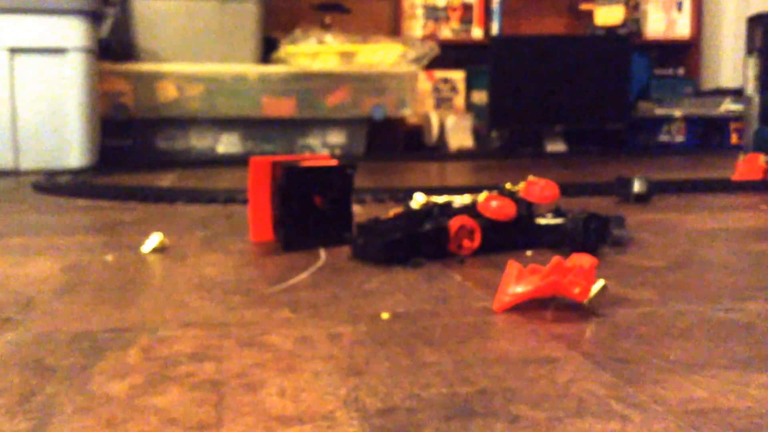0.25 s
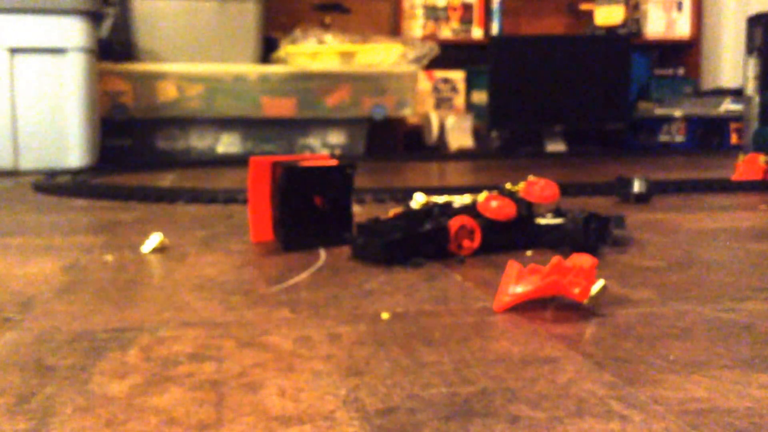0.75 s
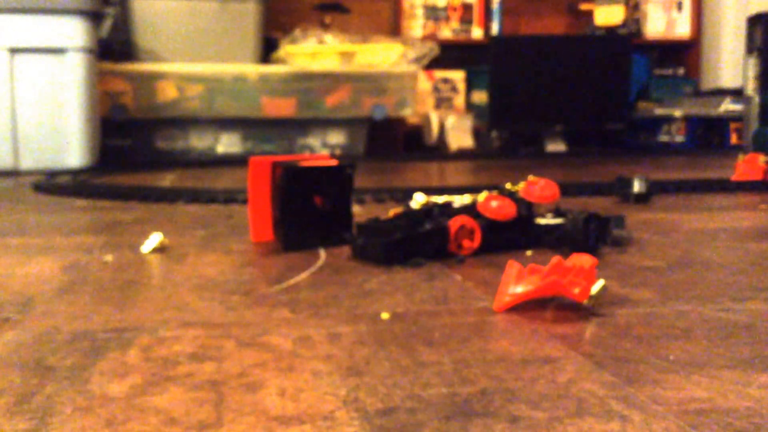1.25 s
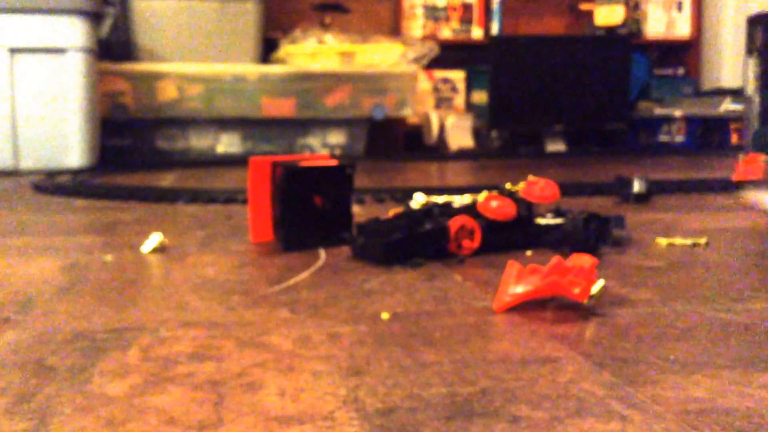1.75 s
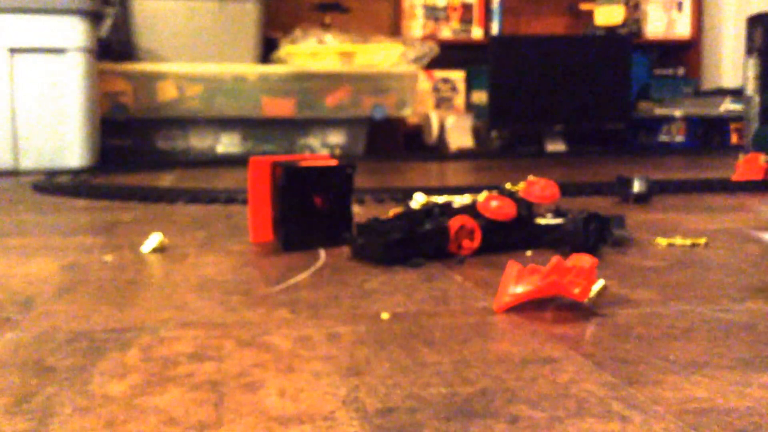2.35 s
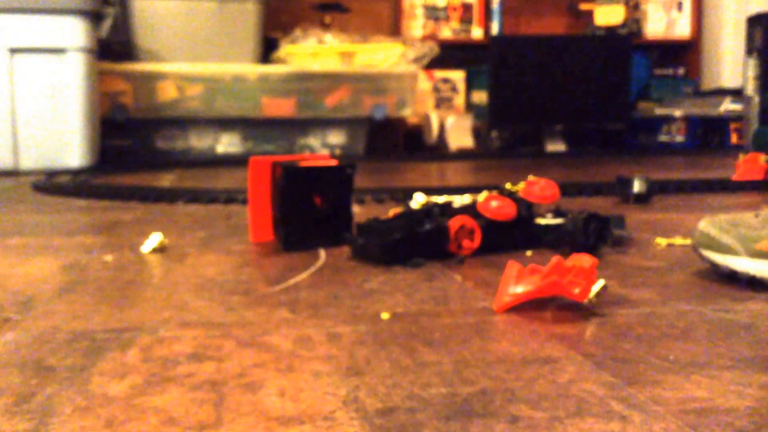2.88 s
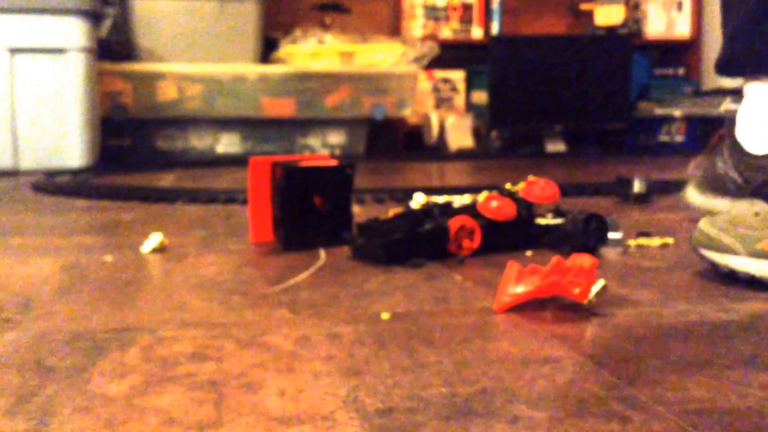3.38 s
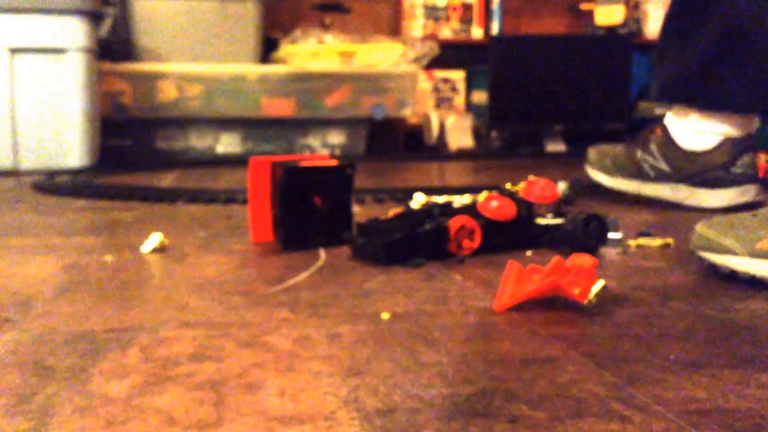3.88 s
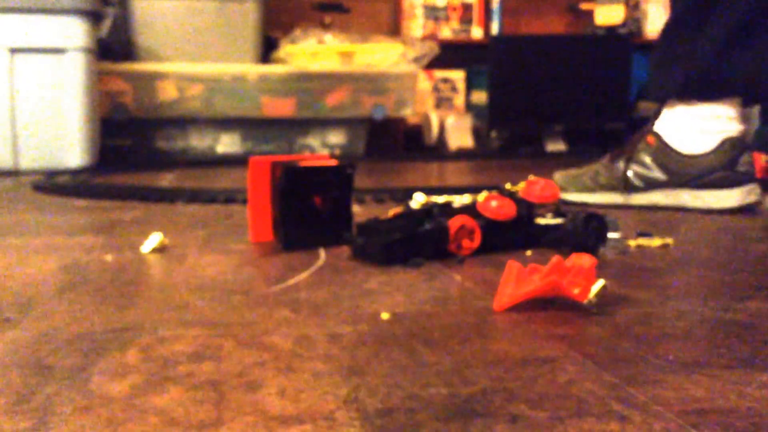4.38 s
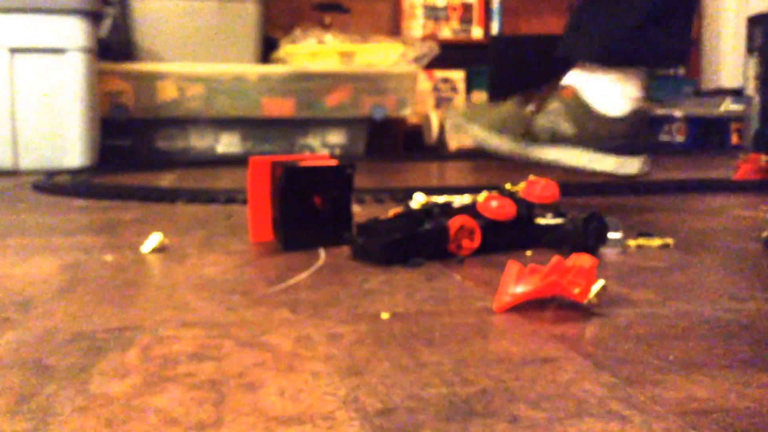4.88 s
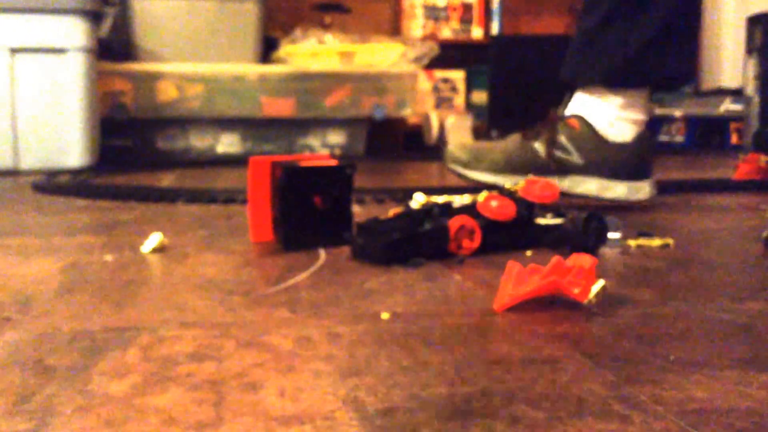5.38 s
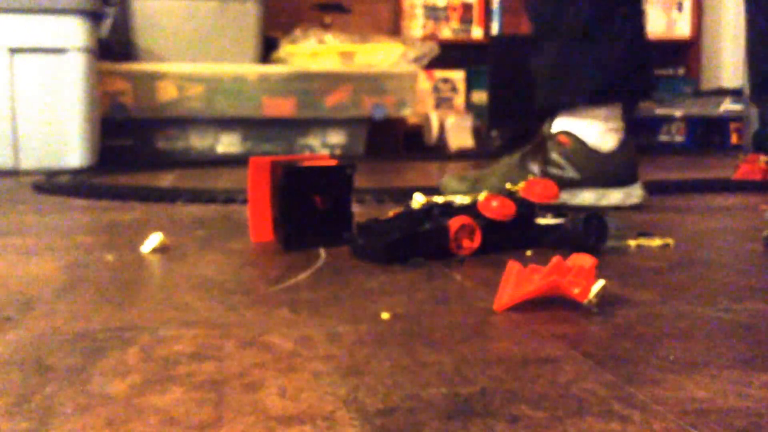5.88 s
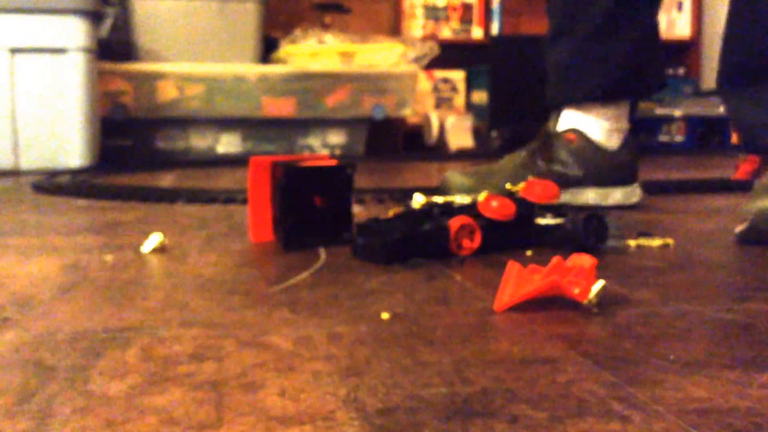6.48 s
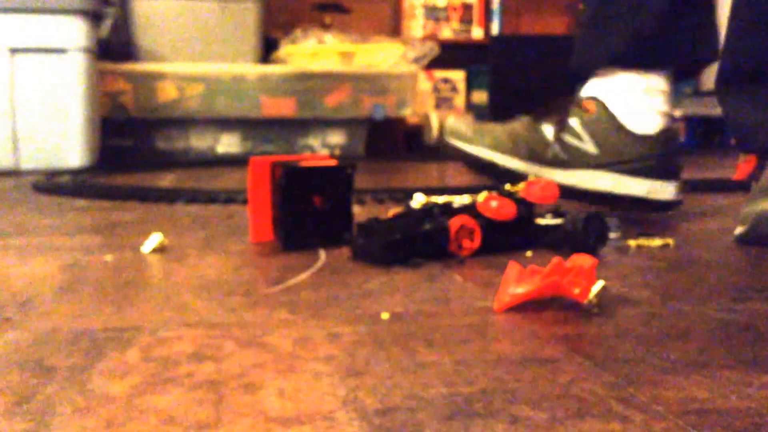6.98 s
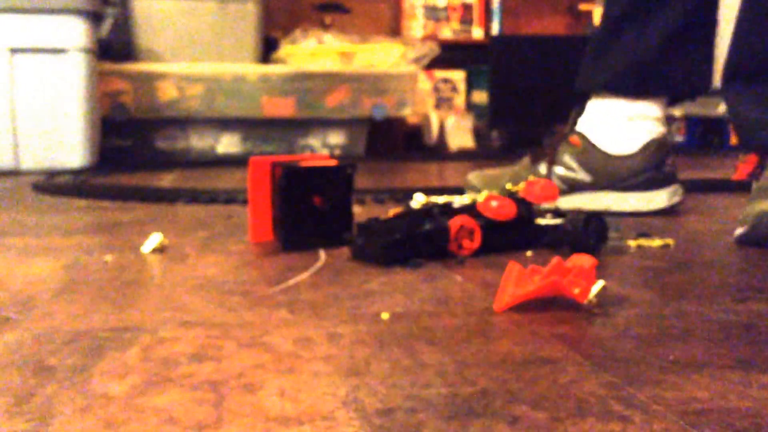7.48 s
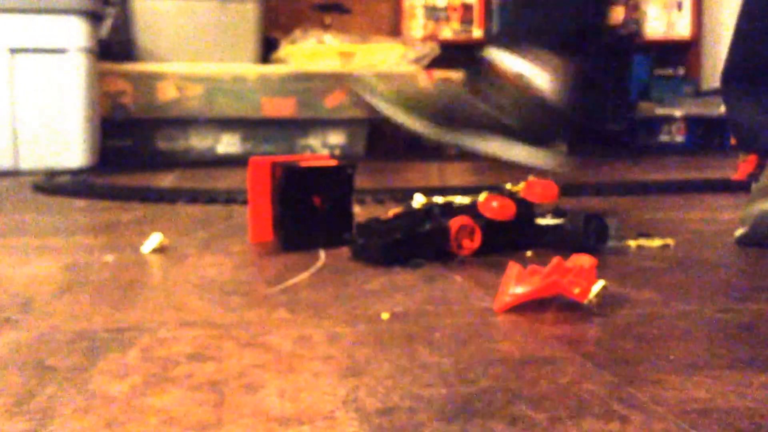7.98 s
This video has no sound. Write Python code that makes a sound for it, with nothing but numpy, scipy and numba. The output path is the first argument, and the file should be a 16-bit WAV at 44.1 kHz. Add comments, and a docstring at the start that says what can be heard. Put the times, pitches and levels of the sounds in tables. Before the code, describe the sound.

Shoes shuffle around a broken plastic toy in a room, their soles rasping on the gritty hard floor and nudging loose parts that tick and rattle. After some soft steps, one shoe comes down hard and the plastic bursts into sharp cracks, slightly overloading the nearby microphone. A few more scrapes and heel thuds come before a shorter, weaker crunch closes the sequence. A faint hum sits behind.

```python
"""Shoes shuffle and step among the pieces of a broken plastic toy, on the hard floor of a cluttered room.
Close to the microphone, soles drag over grit, heels thud and loose parts are knocked and tinkle;
twice a shoe comes down hard and plastic shatters. Further off, the room rings for half a second
over a faint hum. One microphone, mono; the loudest blows overload the recorder slightly."""
import sys
import numpy as np
from scipy import signal
from scipy.fft import rfft, irfft
from scipy.io import wavfile
from scipy.ndimage import uniform_filter1d
from numba import njit

SR = 44100
rng = np.random.default_rng(int(sys.argv[2]) if len(sys.argv) > 2 else 0)


def transcribe(u):
    """Save the signal u as a 16-bit wav file named by the first command-line argument.

    u: samples, shape (n,) or (channels, n), limited to [-1, 1]; the rate is SR.
    q: integer samples, one column per channel.
    """
    v = np.clip(np.atleast_2d(u).T, -1, 1)
    q = np.round(v * 32767).astype(np.int16)
    wavfile.write(sys.argv[1], SR, q)


N = 363384

# Room tone at the microphone: (frequency [Hz], relative level [dB])
AIR_SPECTRUM = [(18, -62), (30, -37.5), (64, -23.5), (95, -19.5), (165, -8.5), (240, -1), (400, -1),
                (500, -1.5), (630, -9), (700, -7), (820, -11), (1010, -12), (2000, -21), (15800, -25)]
# Decay of the room: (frequency [Hz], t60 [s], relative level [dB])
ROOM_DECAY = [(100, 0.75, 4.5), (296, 0.12, -1), (711, 0.42, 1), (1780, 0.45, -0.5), (4770, 0.51, -2),
              (11900, 0.16, -0.5)]
# Modes of a hollow piece: (frequency [Hz], gain [dB], t60 [s])
HOLLOW_MODES = [(492, -4, 0.031), (1632, -6.5, 0.018), (4410, -2, 0.024), (5060, -6, 0.017),
                (5800, -4, 0.013)]
# Modes of a small hard part: (frequency [Hz], gain [dB], t60 before the cap [s])
PART_MODES = [(5600, 3, 0.036), (8150, 0, 0.033), (8900, -2, .015), (9860, -0.5, .015), (10900, -4, 0.019),
              (11900, -5, 0.012), (13800, -4, 0.016)]
# Bounces of that part: (time [s], level [dB], tilt about 8 kHz [dB/octave])
BOUNCES = [(2.989, -51, 29), (3.077, -30.5, 3.5)]
# Plastic knocked or snapping: (time [s], level [dB], pitch [Hz], treble gain [dB], contact time [s])
CRACKS = [(0.107, -44, 4300, 15, 0.006), (.138, -23, 1145, -23, 0.003), (0.1613, -15, 1800, -22, 0.0033),
          (0.3094, -39, 1650, 6, 0.0018), (0.637, -38, 1530, -22, 0.0026), (.676, -34, 1410, -40, 0.00069),
          (0.714, -33.5, 1500, -8, 0.0031), (1.1935, -13.5, 2000, -18, 0.0013),
          (1.396, -20, 2160, 6, 0.014), (1.521, -32, 5300, 12.5, 0.0036),
          (1.5813, -32.5, 5250, -25, 0.0028), (2.0724, -37.5, 1350, -17, 0.0041),
          (2.1196, -35, 2070, -22, 0.0022), (2.4352, -26.5, 3140, -6, 0.0006), (3.157, -34, 3300, 12, .002),
          (3.18, -32.5, 3580, -21, 0.0043), (3.2598, -35.5, 4270, -11, 0.0027),
          (3.6693, -47, 3560, -16, .003), (3.715, -40, 3800, 2, 0.0026), (3.7402, -37.5, 5400, -12, 0.0044),
          (3.8342, -39, 2870, -10, 0.0026), (3.876, -43.5, 8600, -2, .002), (3.858, -50, 2620, -15, 0.0046),
          (4.136, -43, 3160, -13, .003), (4.163, -43, 2160, -24, .003), (4.4618, -34, 1140, -22, 0.004),
          (4.656, -35.5, 4300, -15, 0.0051), (4.659, -38.5, 1800, -30, 0.018),
          (4.94, -32.5, 3300, 6, 0.018), (5.287, -45.5, 1500, -15.5, 0.0065),
          (5.56, -48.5, 2700, -12.5, 0.0055), (5.622, -46, 2530, 5, .002), (5.6433, 2, 2670, -1.5, 0.001),
          (5.7467, -6, 3480, -22, .001), (5.7591, 0.5, 3400, -23, 0.00062), (5.7748, -4, 4900, -20, 0.009),
          (6.4297, -36.5, 4880, -17.5, 0.0073), (6.762, -41, 8500, -6, .006),
          (6.481, -34, 1440, -20, 0.0088), (7.238, -42, 2260, -24.5, 0.0052),
          (8.2244, -12.5, 1220, -7, 0.0043)]
# Modes of the toy's shell: (frequency [Hz], width [Hz], gain [dB])
SHELL_MODES = [(630, 160, -5), (780, 90, -8), (2000, 600, -12), (3100, 200, -6), (3340, 150, 0),
               (3830, 150, -5), (4800, 200, -4), (5300, 300, -6)]
# The shell nudged or trodden on:
# (peak time [s], rise [s], fall [s], level [dB], boom [dB re level], hiss [dB re level])
CRUSHES = [(3.76, 0.091, .2, -55, -9, 1), (3.87, 0.13, 0.39, -57, -7, -6),
           (5.659, .011, 0.19, -18.5, -5, 9), (5.71, 0.061, .15, -27.5, -6, 3),
           (5.762, 0.049, 0.13, -22.5, -6, -9), (5.82, 0.071, 0.065, -29, -22.5, -4.5),
           (8.225, .01, .04, -19.5, 2.5, 1)]
# Hiss of grit and splinters: (frequency [Hz], relative level [dB])
GRIT_SPECTRUM = [(2500, -27.5), (4000, 5), (5500, 11.5), (7400, 7), (9800, 9.5), (12000, 7.5), (15500, 7.5)]
# Long slides of a sole, one list each:
# (time [s], relative level [dB], rasp pitch [Hz], rumble [dB re level], hiss [dB re level])
SLIDES = [
    [(.78, -75.5, 1670, 20, 13), (.844, -47.5, 1660, 17.5, 2.5), (.886, -34.5, 1540, 1, -5.5),
     (.992, -41, 1780, 5.5, -7), (1.166, -22.5, 1950, -17.5, -0.5), (1.29, -34, 1790, -10, 3.5),
     (1.34, -32, 1800, -11, 2.5), (1.412, -39, 2030, 0.5, 9.5), (1.484, -46, 2120, 11, 7),
     (1.552, -55, 2000, 12, 13), (1.62, -65.5, 2350, 1, 17.5), (1.72, -106, 2250, 6, -8)],
    [(2.58, -64, 1970, 14, 5), (2.644, -35.5, 1900, -15, -7.5), (2.732, -33, 1670, -8.5, -8),
     (2.862, -38.5, 2130, -20, -9), (2.924, -44.5, 1360, 6.5, -7), (2.992, -63, 1560, 13.5, 12),
     (3.1, -67, 2370, 7, -3)],
    [(6.45, -62.5, 1710, 15, -4), (6.488, -36, 1800, 5.5, -3.5), (6.556, -37, 2430, -1, -1),
     (6.608, -36, 3480, 0.5, -0.5), (6.664, -45, 2290, 1, 6), (6.82, -54, 2210, -3.5, 11.5),
     (6.93, -86.5, 2530, 1.5, -9.5)],
]
# Tone of each slide: (share ringing in the tread [0-1], squeak at start [Hz], squeak at end [Hz])
SLIDE_TONES = [(0.78, 6400, 10500), (0.43, 7200, 7900), (0.03, 3300, 9200)]
# Short scuffs: (peak time [s], rise [s], fall [s], relative level [dB], rasp pitch [Hz],
# share ringing in the tread [0-1], rumble [dB re level], hiss [dB re level])
SCUFFS = [(0.158, 0.034, 0.047, -26, 1810, 0, 3, 1), (.222, 0.06, 0.1, -39.5, 1780, 0, 2.5, 2),
          (.424, 0.2, 0.034, -60, 2070, 0.3, 9, 10), (.74, 0.37, 0.06, -59, 1500, 0.1, -3, 3),
          (2.104, 0.093, 0.25, -46, 2060, 0, -0.5, -1), (2.443, 0.0086, 0.091, -45, 3250, 0.2, 2, -12),
          (3.0, .03, 0.17, -62, 2300, 0.4, 5, 7), (3.13, 0.22, 0.29, -60.5, 3000, 0.7, 9.5, 15),
          (3.192, 0.11, .18, -48, 3380, .6, -12, 3), (3.62, 0.39, 0.44, -66.5, 1500, 0, 10, -8),
          (3.746, 0.095, 0.099, -48, 2960, 0.4, -12, -1), (3.84, 0.11, 0.29, -56.5, 3080, 0.7, .4, 6),
          (3.944, 0.37, 0.18, -61, 2730, 0, -1, -14), (4.158, 0.33, 0.31, -64.5, 2500, .4, 11, -5),
          (4.268, 0.17, 0.041, -58.5, 2510, .1, -5, 6.5), (4.55, 0.17, 0.14, -63.5, 2800, 0.1, 9, -2),
          (4.665, 0.12, 0.46, -56.5, 1700, 0.3, 1.5, 1), (4.953, 0.032, 0.16, -43, 2426, 0.16, 3.5, 4.5),
          (6.262, 0.077, 0.036, -67.5, 2560, .7, 7, 5), (7.25, .03, 0.097, -58, 2300, .2, 6, 1),
          (7.629, 0.13, 0.16, -44, 1900, 0.37, 3, -2), (8.09, .4, 0.49, -56.5, 4640, 0.3, -2.5, -3),
          (8.211, 0.011, .03, -45.5, 1260, 0.08, 2, -17)]
# Heels and toes landing: (time [s], level [dB], pitch [Hz], t60 of the puff [s])
FOOTFALLS = [(.138, -25.5, 520, 0.066), (.157, -15, 710, 0.01), (0.192, -22.5, 362, 0.017),
             (0.202, -25, 77.6, 0.08), (.228, -23, 292, 0.15), (.637, -40, 303, 0.16),
             (.676, -26.5, 520, 0.016), (.68, -36, 260, 0.018), (.714, -31, 265, 0.036),
             (1.399, -29, 666, 0.031), (2.046, -38.5, 190, 0.07), (2.08, -33, 170, 0.064),
             (2.435, -21, 640, 0.02), (3.698, -35, 248, 0.041), (4.462, -35, 313, 0.021),
             (4.654, -39, 493, 0.033), (4.939, -35, 307, 0.24), (5.644, -8, 720, 0.093),
             (5.748, -14.5, 543, 0.086), (6.306, -43, 320, 0.06), (6.339, -48, 298, 0.053),
             (6.471, -33, 754, 0.11), (7.192, -29, 300, 0.037), (7.21, -34.5, 227, 0.074),
             (7.239, -34.5, 251, 0.089), (8.211, -23, 692, 0.098), (8.214, -19.5, 171, 0.067)]


def from_db(db):
    return 10 ** (np.asarray(db) / 20)


def unit_rms(x):
    return x / np.sqrt(np.mean(x ** 2) + 1e-20)


def at_hz(table, hz, column=1):
    table = np.array(table)
    return np.interp(np.log(hz), np.log(table[:, 0]), table[:, column])


def band(x, low_hz, high_hz):
    sos = signal.butter(2, [low_hz, min(high_hz, .45 * SR)], "band", fs=SR, output="sos")
    return signal.sosfilt(sos, x + 1e-18)


def shaped(x, spectrum):
    """Colours x with a (frequency [Hz], level [dB]) table; rms 1."""
    hz = np.maximum(np.fft.rfftfreq(len(x), 1 / SR), 1)
    return unit_rms(irfft(rfft(x) * from_db(at_hz(spectrum, hz)), len(x)))


def ring(clicks, hz, t60):
    """A unit click sets a sine of height 1 ringing."""
    r, w = from_db(-60 / (t60 * SR)), 2 * np.pi * hz / SR
    return signal.lfilter([0, np.sin(w)], [1, -2 * r * np.cos(w), r * r], clicks + 1e-18)


@njit
def two_pole(x, w, r):
    out = np.zeros(len(x))
    for i in range(2, len(x)):
        out[i] = x[i] - x[i - 2] + 2 * r * np.cos(w[i]) * out[i - 1] - r * r * out[i - 2]
    return out


def glide(x, hz, width_hz):
    """A resonance whose centre moves; rms 1."""
    return unit_rms(two_pole(x, 2 * np.pi * hz / SR, np.exp(-np.pi * width_hz / SR)))


def grains(per_s, spread_db=3):
    """Random clicks of uneven size; rms 1."""
    sizes = from_db(spread_db * np.minimum(rng.exponential(1, N), 4)) * rng.choice([-1, 1], N)
    return unit_rms(sizes * (rng.random(N) < per_s / SR))


def swells(rows, depth_db=30, roundness=1.24):
    """Gains of a main, a low and a high layer, depth_db down one rise before and one fall after a peak."""
    t, gains = np.arange(N) / SR, np.full((3, N), 1e-7)
    for peak_s, rise_s, fall_s, db, low_db, high_db in rows:
        span = slice(round((peak_s - 1.5 * rise_s) * SR), round((peak_s + 1.5 * fall_s) * SR))
        since = t[span] - peak_s
        drop_db = depth_db * np.maximum(-since / rise_s, since / fall_s) ** roundness
        gains[:, span] += from_db([[0], [low_db], [high_db]]) * from_db(db - drop_db)
    return gains


def room_tone(air_db=-58.5, hum_db=-69, hum_hz=120.2):
    """Far background: a soft, steady rush of air and a faint hum."""
    air = from_db(air_db) * shaped(rng.standard_normal(N), AIR_SPECTRUM)
    hum = from_db(hum_db) * np.sin(2 * np.pi * hum_hz * np.arange(N) / SR)
    return air + hum


def room_echoes(x, build_up_s=.0024):
    """Dense echoes off walls and clutter build up, then die at their own rate in each half octave."""
    t = np.arange(SR) / SR
    white = rng.standard_normal((2, SR))
    edges_hz = 40 * 2 ** np.arange(0, 9.1, .5)
    t60s, gains = at_hz(ROOM_DECAY, edges_hz), from_db(at_hz(ROOM_DECAY, edges_hz, column=2))
    tail = np.zeros(SR)
    for k, (low, high) in enumerate(zip(edges_hz, edges_hz[1:])):
        decay = from_db(-60 * t / t60s[k]) / np.sqrt(t60s[k])
        tail += gains[k] * band(white[k % 2], low, high) * decay
    tail *= 1 - np.exp(-(t / build_up_s) ** 2)
    return signal.fftconvolve(x, tail / np.sqrt(np.sum(tail ** 2)))[:N]


def hollow_tap(at_s=4.656, drive_db=-56.5, chatter_s=.022):
    """A hollow piece is tapped: a short dying chatter rings all its modes."""
    since = np.arange(N) / SR - at_s
    envelope = (since >= 0) * np.exp(-np.abs(since) / chatter_s)
    chatter = from_db(drive_db) * rng.standard_normal(N) * envelope
    return sum(from_db(db) * ring(chatter, hz, t60) for hz, db, t60 in HOLLOW_MODES)


def tinkles(t60_cap_s=.03):
    """Each bounce strikes every mode of a small hard part; the lighter touch favours the high ones."""
    times, bounce_db, tilt_db = np.transpose(BOUNCES)
    out = np.zeros(N)
    for hz, mode_db, t60 in PART_MODES:
        clicks = np.zeros(N)
        clicks[(times * SR).astype(int)] = from_db(bounce_db + mode_db + tilt_db * np.log2(hz / 8000))
        out += ring(clicks, hz, min(t60, t60_cap_s)) + 2 * band(clicks, .8 * hz, 1.2 * hz)
    return out


def plastic_cracks():
    """Each crack is a spike and a spray of splinters, coloured and briefly rung by the piece hit."""
    out, t = np.zeros(N + SR), np.arange(SR // 10) / SR
    for at_s, db, hz, treble_db, contact_s in CRACKS:
        burst = .34 * rng.standard_normal(len(t)) * np.exp(-t / contact_s)
        burst[0] = 2.8   # the spike
        knock = .08 * ring(burst, hz, t60=.009) + band(burst, .45 * hz, 1.9 * hz)
        treble = from_db(treble_db) * band(burst, 6300, 17000)
        start = round(at_s * SR)
        out[start:start + len(t)] += from_db(db) * (1.92 * knock + treble)
    return out[:N]


def shell_crushes():
    """The toy rattles or splinters underfoot: dense clicks ring its shell, boom in the floor and hiss."""
    body_gain, boom_gain, hiss_gain = swells(CRUSHES)
    fractures = grains(per_s=4600)
    shell = sum(from_db(db) * ring(fractures, hz, t60=np.log(1000) / (np.pi * width_hz))
                for hz, width_hz, db in SHELL_MODES)
    body = unit_rms(.8 * unit_rms(shell) + .45 * unit_rms(band(fractures, 1000, 6000)))
    boom = unit_rms(band(fractures, 360, 1400))
    return body_gain * body + boom_gain * boom + hiss_gain * shaped(fractures, GRIT_SPECTRUM)


def slide_gains(t):
    """Gains of rasp, rumble and hiss along the long slides, silent in between."""
    level_db = np.full(N, -140.)
    for slide in SLIDES:
        times, db = np.transpose(slide)[:2]
        inside = (t >= times[0]) & (t <= times[-1])
        level_db[inside] = np.interp(t[inside], times, db)
    gain = uniform_filter1d(from_db(level_db), size=90)
    times, _, _, rumble_db, hiss_db = np.concatenate(SLIDES).T
    return gain * from_db([np.zeros(N), np.interp(t, times, rumble_db), np.interp(t, times, hiss_db)])


def sole_tones(t, scuff_squeak_hz=6730):
    """Rasp pitch, ringing share and squeak pitch, gliding through all scuffs and slides."""
    points = [(at_s, hz, share, scuff_squeak_hz) for at_s, _, _, _, hz, share, _, _ in SCUFFS]
    for slide, (share, start_hz, end_hz) in zip(SLIDES, SLIDE_TONES):
        squeaks = np.linspace(start_hz, end_hz, len(slide))
        points += [(at_s, hz, share, squeak) for (at_s, _, hz, _, _), squeak in zip(slide, squeaks)]
    times, *columns = np.transpose(sorted(points))
    return [np.interp(t, times, column) for column in columns]


def sole_drags(rumble_octaves_per_db=.02):
    """Grit slips under the sole: the same slips rasp in the tread, rumble in the floor and hiss."""
    t = np.arange(N) / SR
    scuff_gains = swells((*timing, db, rumble, hiss) for *timing, db, _, _, rumble, hiss in SCUFFS)
    rasp_gain, rumble_gain, hiss_gain = scuff_gains + slide_gains(t)
    rasp_hz, ringing, squeak_hz = sole_tones(t)
    pressure_db = 20 * np.log10(rasp_gain) + 45   # harder pressure rumbles higher
    rumble_hz = np.maximum(720 * 2 ** (rumble_octaves_per_db * pressure_db), 450)
    slips = grains(per_s=5000)
    tread = glide(glide(slips, .87 * rasp_hz, width_hz=900), 1.15 * rasp_hz, width_hz=900)
    rasp = np.sqrt(ringing) * tread + np.sqrt(1 - ringing) * unit_rms(band(slips, 880, 4780))
    rumble = unit_rms(glide(slips, rumble_hz, width_hz=383) + .65 * unit_rms(band(slips, 310, 1620)))
    hiss = shaped(slips, GRIT_SPECTRUM) + .35 * glide(slips, squeak_hz, width_hz=1300)
    return rasp_gain * rasp + rumble_gain * rumble + hiss_gain * hiss


def footfalls(swing_cycles=5):
    """A heel or toe pushes on the floor: a swing that dies in a few cycles, with a puff of low noise."""
    out, t = np.zeros(N + SR), np.arange(SR // 4) / SR
    for at_s, db, hz, t60 in FOOTFALLS:
        swing = np.sin(2 * np.pi * hz * t) * from_db(-60 * t * hz / swing_cycles)
        puff = unit_rms(band(rng.standard_normal(len(t)), .81 * hz, 2.04 * hz)) * from_db(-60 * t / t60)
        start = round(at_s * SR)
        out[start:start + len(t)] += from_db(db) * (2.26 * swing + .36 * puff)
    return out[:N]


def scene(bass_cut_hz=213, echo_db=-3):
    """At the microphone: shoes and plastic close by, the room behind them."""
    near = from_db(-6) * sole_drags() + shell_crushes() + footfalls()
    near += plastic_cracks() + tinkles() + hollow_tap()
    bass_cut = signal.butter(3, bass_cut_hz, "high", fs=SR, output="sos")
    near = signal.sosfilt(bass_cut, near)   # low bass is cut from the close sounds, leaving them thin
    return (room_tone() + near + from_db(echo_db) * room_echoes(near))[None]


def record(dry, ceiling=.75, cutoff_hz=15750):
    """The recorder rounds the loudest peaks and cuts the top of the treble."""
    rounded = ceiling * np.tanh(dry / ceiling)
    return signal.sosfilt(signal.cheby2(20, 80, cutoff_hz, fs=SR, output="sos"), rounded)


dry = scene()
out = record(dry)
transcribe(out)
```